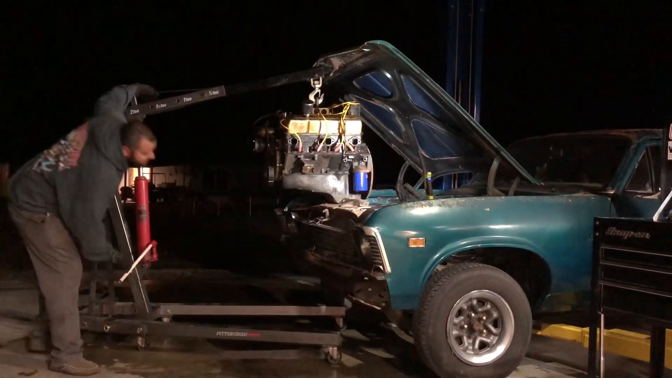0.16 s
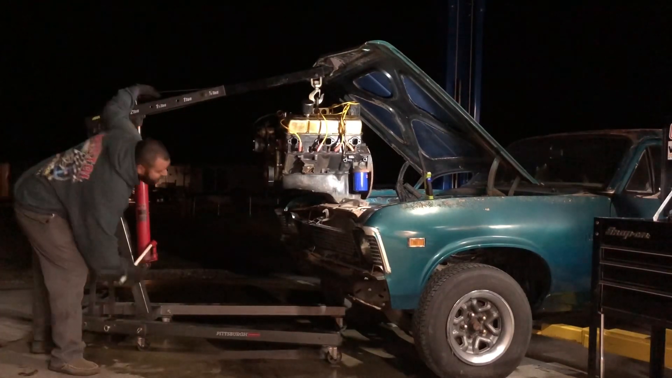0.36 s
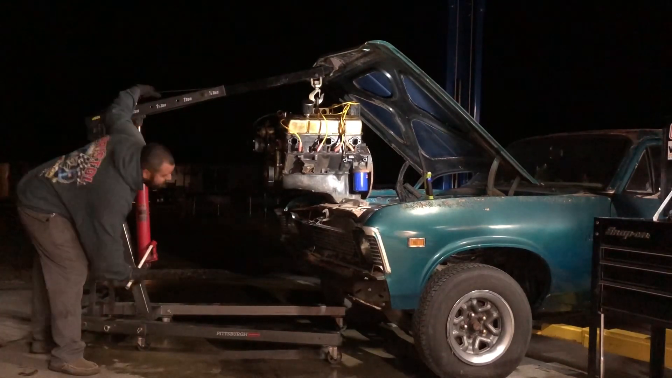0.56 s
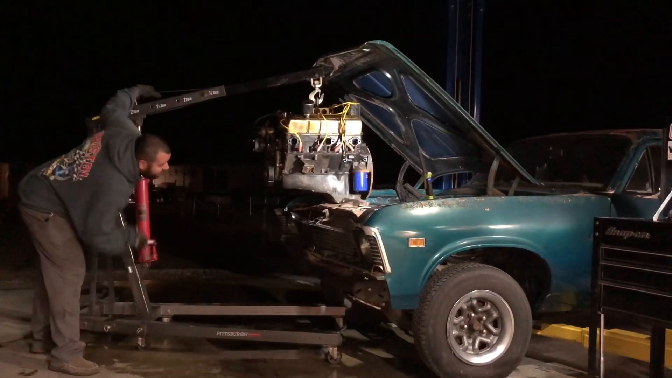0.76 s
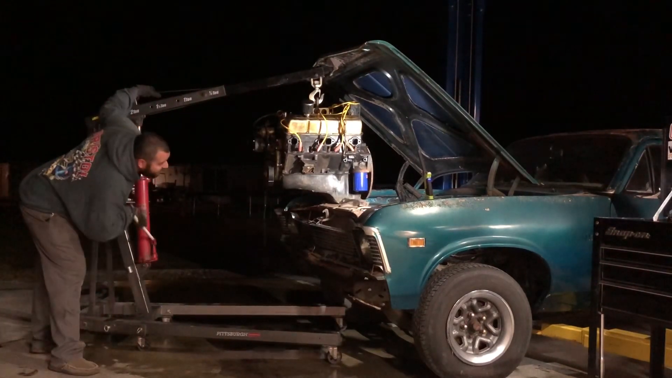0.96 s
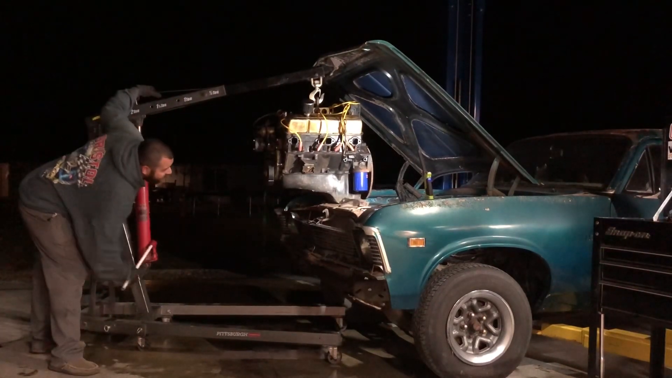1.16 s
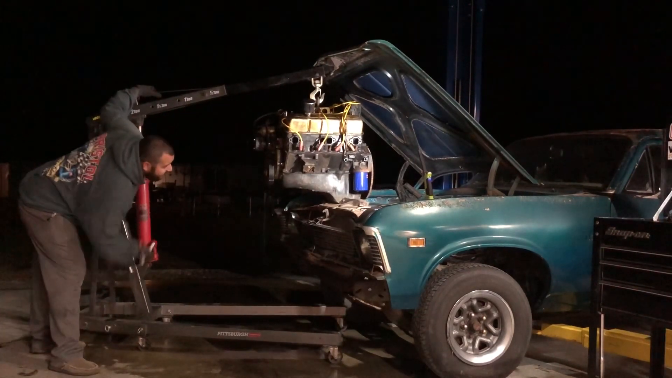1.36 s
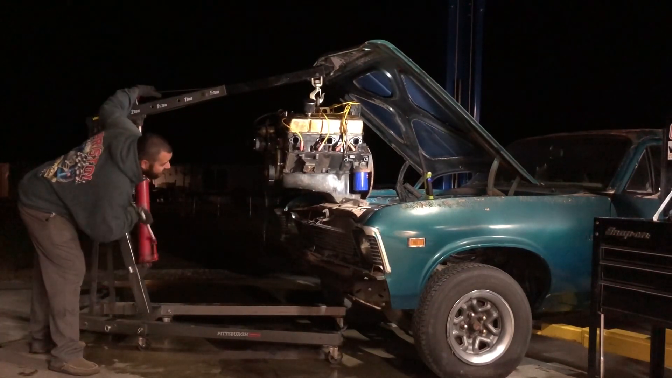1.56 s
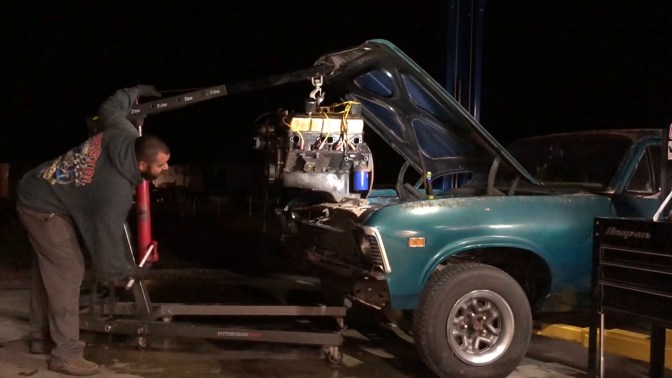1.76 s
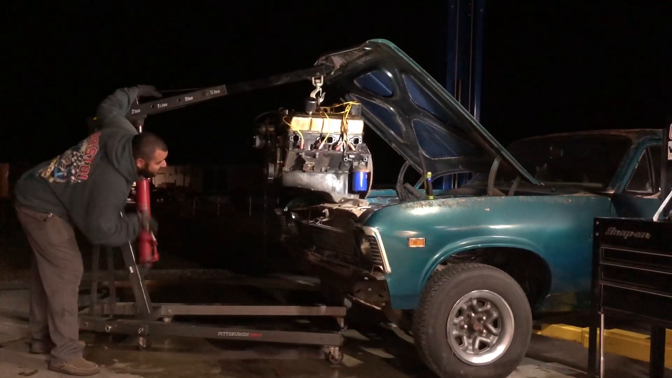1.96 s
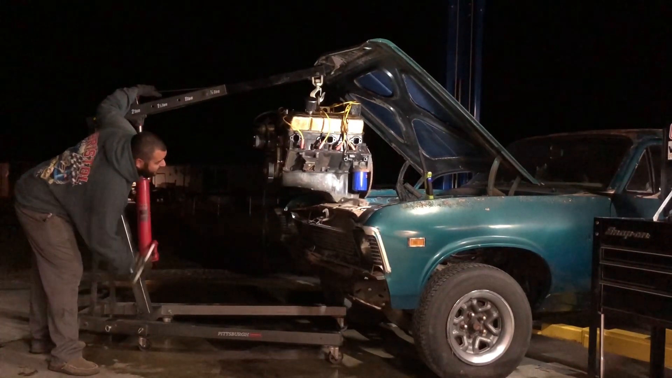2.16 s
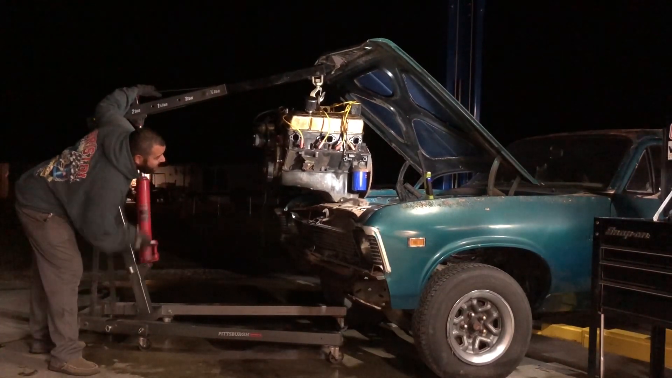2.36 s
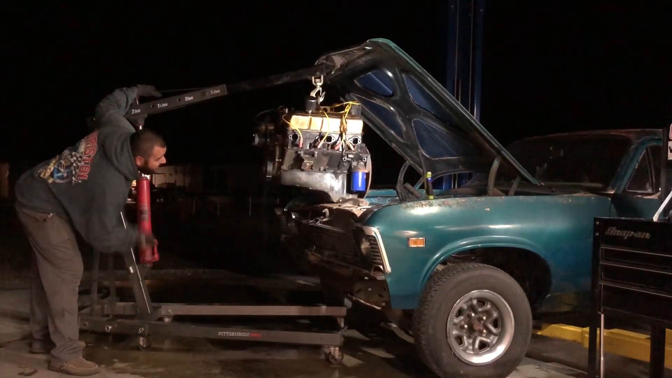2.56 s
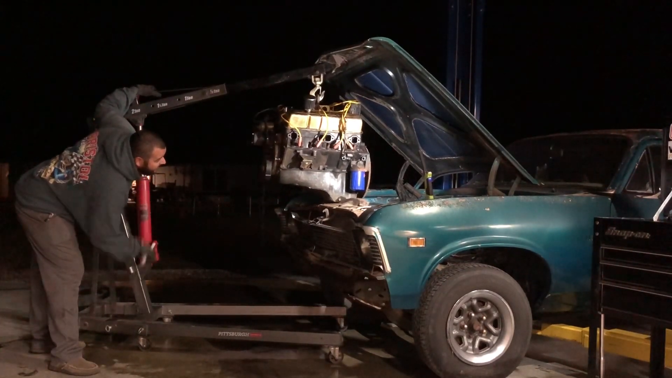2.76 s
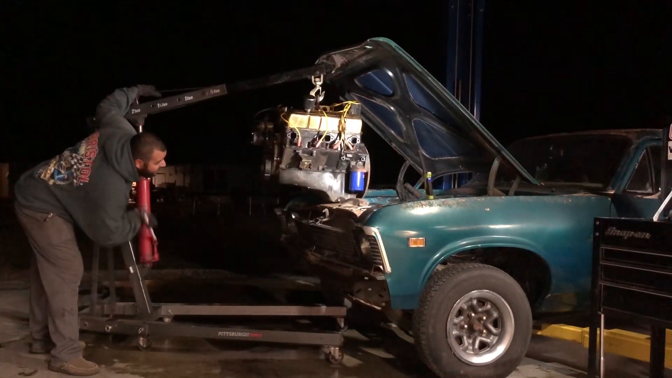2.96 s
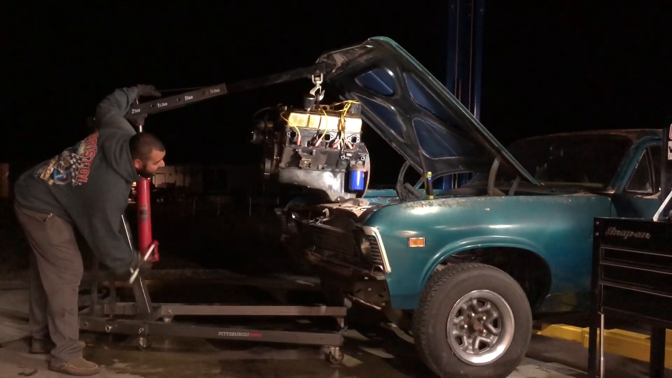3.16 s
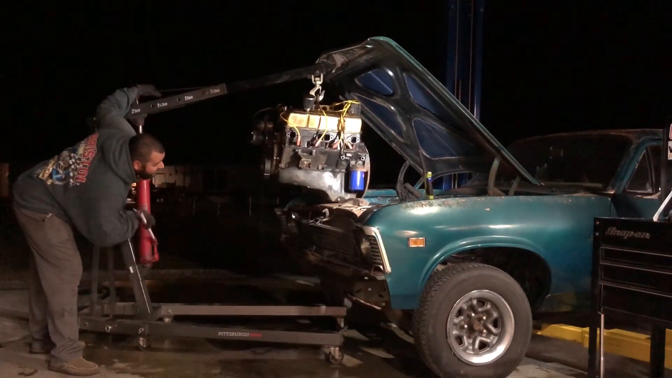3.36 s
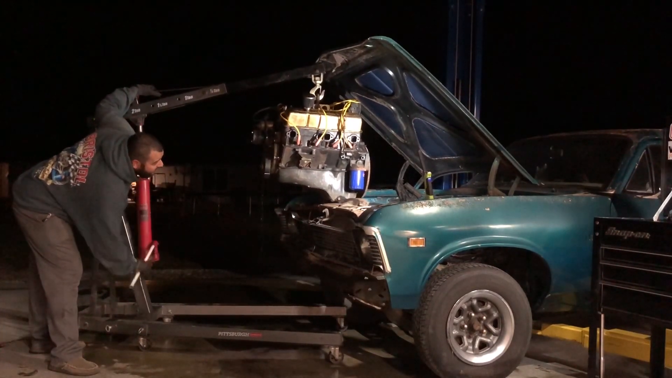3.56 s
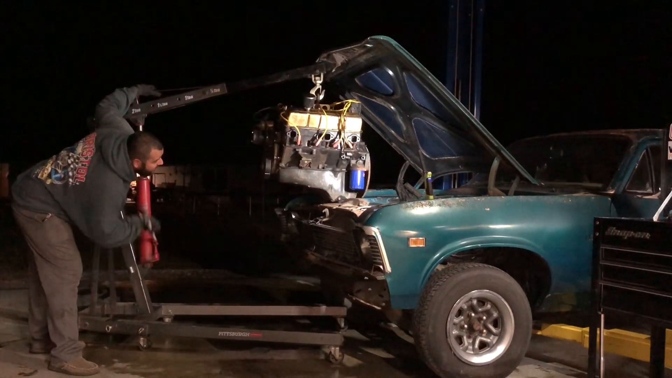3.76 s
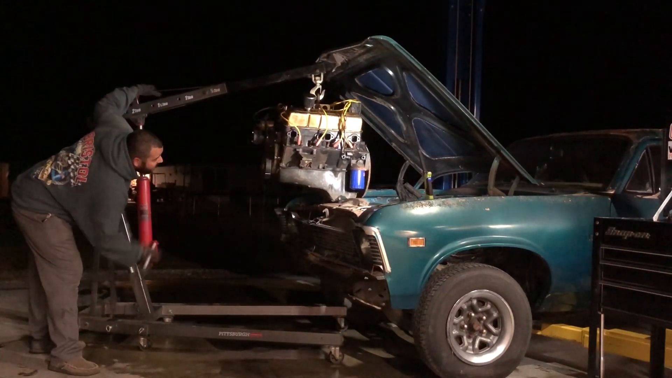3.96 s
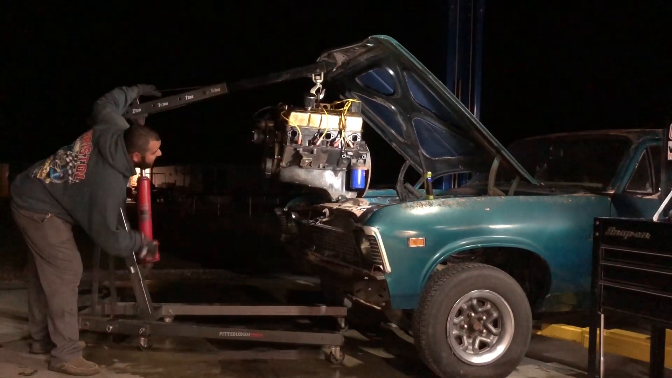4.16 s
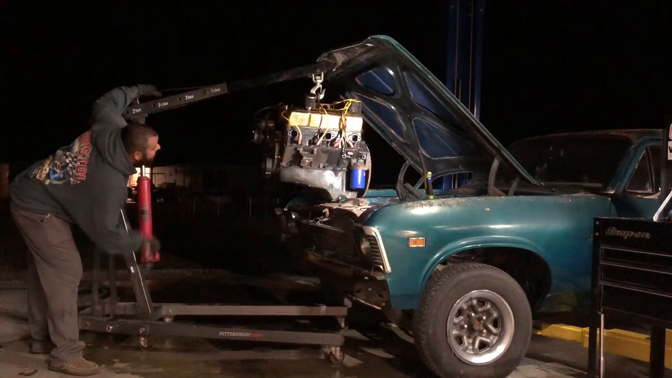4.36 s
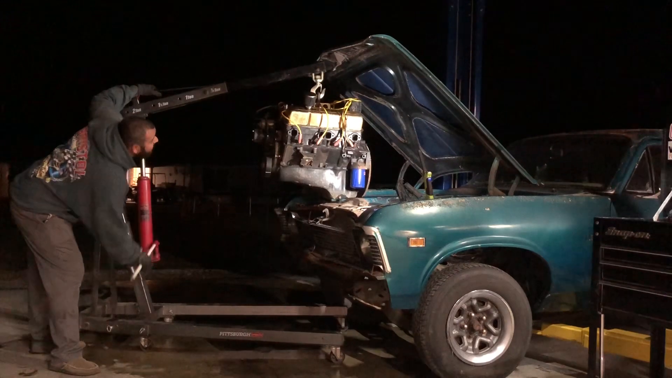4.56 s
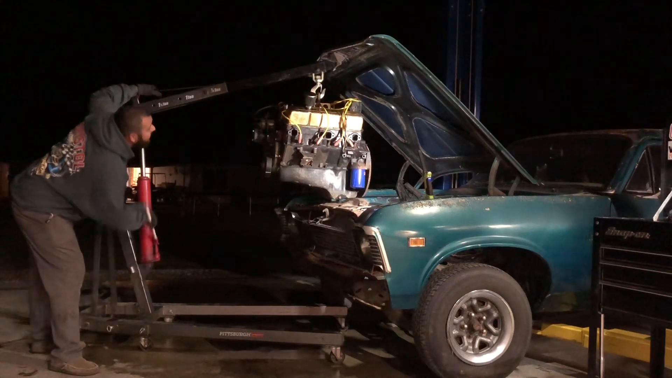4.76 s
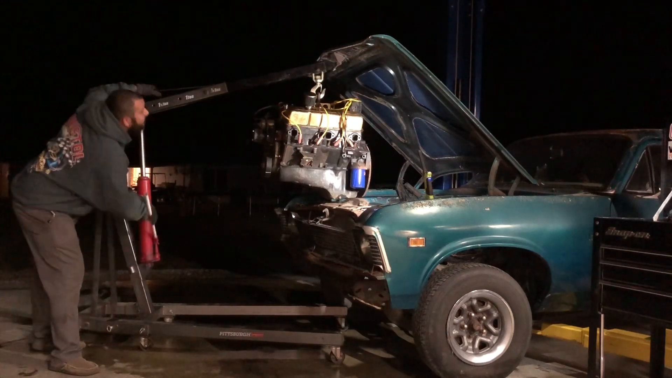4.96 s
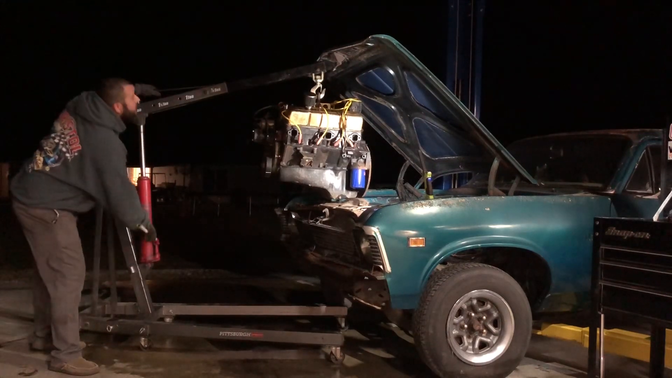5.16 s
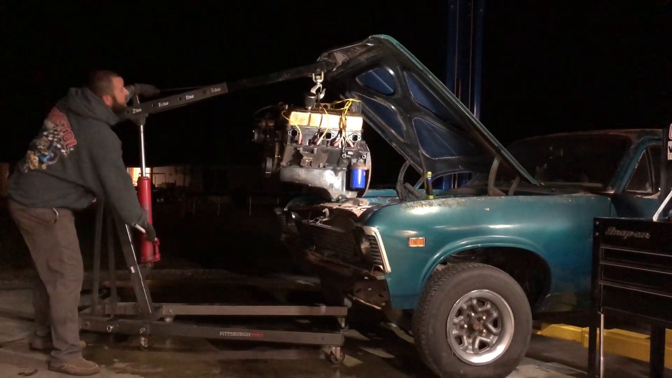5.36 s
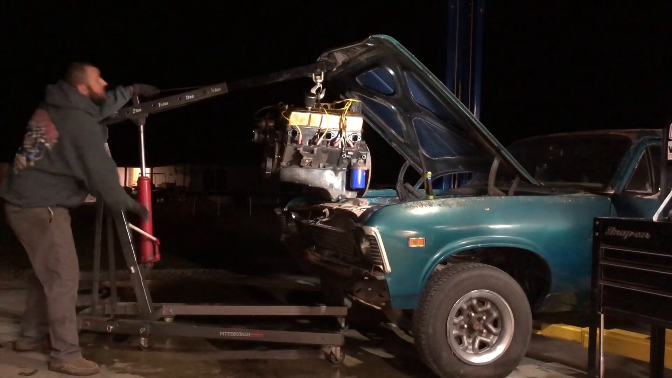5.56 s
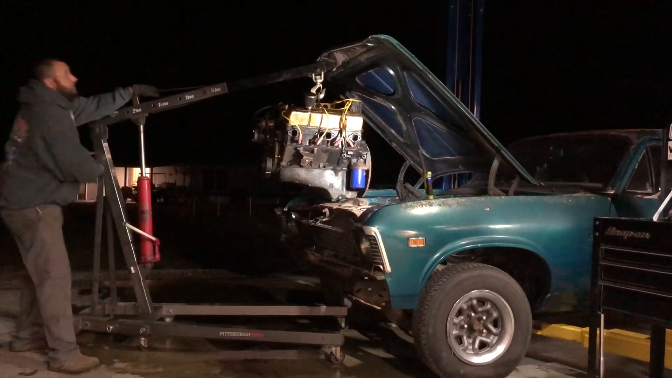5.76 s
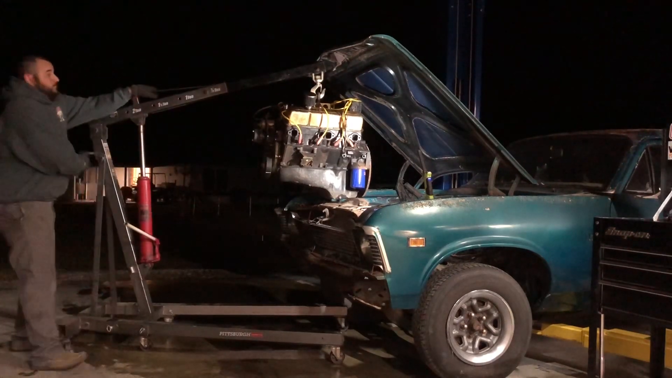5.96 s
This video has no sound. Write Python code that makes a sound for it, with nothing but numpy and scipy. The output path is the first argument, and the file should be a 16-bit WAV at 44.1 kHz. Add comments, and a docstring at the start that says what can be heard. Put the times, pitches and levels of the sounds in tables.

```python
"""Steel clanks, rattles and rings as a man pumps the handle of a hydraulic engine hoist in a bare yard at night.
Each clank is a short burst of crackling noise plus the fading ring tones of the loose handle.
The loaded frame adds dull knocks of soft noise and its own low ring; loose parts tick at random.
Fading noise makes the short tail from the walls; far traffic, mains hum and a low drone lie under it all,
and a burst of bright noise makes the scuffing hiss at the end."""
import sys
import numpy as np
from scipy import signal
from scipy.fft import rfft, irfft
from scipy.io import wavfile
from scipy.ndimage import uniform_filter1d

SR = 44100
rng = np.random.default_rng(int(sys.argv[2]) if len(sys.argv) > 2 else 0)


def master(y):
    """Save y as 16-bit WAV."""
    cut = np.clip(np.atleast_2d(y).T, -1, 1)
    pcm = np.round(cut * 32767)  # scale
    wavfile.write(sys.argv[1], SR, pcm.astype(np.int16))


N = 265029

# ring tones of the handle and ram: (pitch [Hz], relative level [dB], time to fall 60 dB [s])
HANDLE_MODES = [(1770, -10.5, 0.14), (1826, -2, 0.26), (2267, -0.5, 0.15), (2350, -7.5, 0.055),
                (2584, 1, 0.11), (2700, -3, 0.24), (3330, -15, 0.054), (3360, -1.5, 0.22),
                (3520, -4.5, 0.25), (4550, -10, 0.071), (4660, -29.5, .13), (4880, -2.5, 0.15),
                (5110, -9.5, 0.42), (5280, -4.5, 0.19), (5810, -23.5, .1), (6300, -12, 0.1),
                (6700, -9, 0.4), (6810, 4, 0.047), (7200, -20, 0.14), (9130, -17, 0.079),
                (8770, 6.5, 0.054), (8550, -26.5, 0.076), (10750, -10.5, 0.12), (10700, -16, .08),
                (10810, 4.5, 0.088), (13400, -3.5, 0.15), (15450, -5.5, .07)]
# ring tones of the hoist frame: (pitch [Hz], relative level [dB], time to fall 60 dB [s])
FRAME_MODES = [(258, -1, .15), (292, -15.5, .12), (352, -11, .1), (427, -14.5, 0.17), (584, -7, .06),
               (730, -1.5, 0.025), (842, 6, .08), (980, 4.5, 0.056), (964, -7, 0.15), (1430, -2.5, .08)]


def undb(db):
    """Turn decibels into a plain amplitude factor."""
    return 10 ** (np.asarray(db) / 20)


def unit(x):
    """Scale a sound to an average (RMS) level of 1."""
    return x / np.sqrt(np.mean(x ** 2))


def colour(x, hz, db):
    """Filter by (Hz, dB) points joined on a log-frequency axis."""
    freq = np.maximum(np.fft.rfftfreq(len(x), 1 / SR), 1)
    gain = undb(np.interp(np.log(freq), np.log(hz), db))
    return irfft(rfft(x) * gain, len(x))


def walk(rate):
    """Random values, `rate` new ones a second, joined by straight glides and scaled to RMS 1."""
    hold = int(SR / rate)
    steps = np.repeat(rng.standard_normal(N // hold + 1), hold)
    return unit(uniform_filter1d(steps, hold)[:N])


def add(track, s, x):
    """Mix a sound into the track, starting at s seconds."""
    start = int(s * SR)
    track[start:start + len(x)] += x[:len(track) - start]


def blow(noise, t60, rise_s, db):
    """Noise under a quick rise and an exponential fall, with the energy that the envelope alone would have."""
    t = np.arange(len(noise)) / SR
    rise = 1 - np.exp(-(t / rise_s) ** 2)
    shape = rise * undb(-60 * t / max(t60, .004))
    return unit(noise * shape) * np.sqrt(np.mean(shape ** 2)) * undb(db)


def struck(modes, favoured_hz, lift_db, spread):
    """The place of the blow lifts the modes near one pitch; spread is a width in log frequency."""
    lifted = []
    for hz, db, t60 in modes:
        closeness = np.exp(-(np.log(hz / favoured_hz) / spread) ** 2)
        lifted.append((hz, db + lift_db * closeness, t60))
    return lifted


def ring(modes, rough, flicker):
    """Fading sine tones set off by one blow; loose contact soon makes them flicker, which smears their pitch."""
    t = np.arange(SR // 3) / SR
    smear = rough * (1 - np.exp(-t / .012))
    out = 0
    for hz, db, t60 in modes:
        # each mode reads the flicker from a different place
        waver = 1 - smear + smear * np.roll(flicker, int(7 * hz))[:len(t)]
        # a little stronger or weaker every time
        start_db = db + 3 * rng.standard_normal()
        fade = undb(start_db - 60 * t / max(t60, .01))
        out = out + waver * fade * np.sin(2 * np.pi * (hz * t + rng.random()))
    return out * (1 - np.exp(-(t / 0.0017) ** 2))


def clanks():
    """Steel on steel: a rattle of tiny contacts cracks in the air and sets the handle ringing."""
    # blows: (time [s], crack level [dB], body at 2 kHz [dB], sharpness at 13.5 kHz [dB],
    #         favoured ring [Hz], time for the crack to fall 60 dB [s]); body and sharpness relative to 4.8 kHz
    clank_table = [(0.3312, -44.5, 18, -44, 2020, 0.1), (0.588, -47, 7, -22, 4160, 0.086),
                   (0.6163, -39, 2, -23, 3440, .048), (.629, -29.5, 4, -1, 10200, 0.04),
                   (0.7092, -31.5, 1, -16, 4530, 0.077), (0.7824, -40, -4, -18, 3560, 0.03),
                   (0.8094, -20.5, 1.5, -16, 8760, 0.036), (.8934, -37, -4, -22, 3980, 0.027),
                   (0.939, -37.5, 4, -7, 4240, 0.027), (0.95, -42, 10, -14, 4580, 0.055),
                   (0.992, -47, -3, -6, 8770, .028), (1.0877, -25.5, 6.5, -27, 4670, 0.099),
                   (1.2024, -44, 12, -25, 3500, 0.021), (1.2204, -39, -5, -16, 3540, 0.059),
                   (1.2787, -37, 2, -2, 6500, 0.069), (1.312, -40.5, -15.5, -9.5, 11900, 0.031),
                   (1.3253, -27, -13, -18.5, 4500, 0.071), (1.417, -34, -14.5, -6, 11000, 0.01),
                   (1.4379, -14.5, -5.5, -6, 5240, 0.038), (1.4994, -42, -11, -12, 3560, 0.05),
                   (1.5294, -35.5, 7, -9, 3570, 0.049), (1.5625, -38.5, 12, -21, 5110, 0.13),
                   (1.6592, -24, 0.5, -25, 3560, 0.092), (1.703, -36, -10, -7, 3490, .045),
                   (1.7587, -34, 0, -21, 3630, 0.065), (1.8087, -37, -7.5, -11, 3500, 0.041),
                   (1.825, -36.5, -5, -29, 3460, 0.14), (1.9002, -39, -21, -5.5, 3520, 0.048),
                   (1.9365, -49.5, 12, 8.5, 11000, 0.073), (1.9722, -7, -5.5, -7.5, 6300, 0.049),
                   (1.9914, -17, -2, -16, 6700, 0.021), (2.049, -28.5, 6, -30, 6750, .033),
                   (2.1136, -26, 9.5, -22.5, 3570, 0.093), (2.2077, -44, 4, -13, 4880, 0.25),
                   (2.2438, -29, -10, -4, 6630, 0.044), (2.2825, -31.5, -2, -19.5, 4860, .04),
                   (2.2973, -25.5, -3, -11, 4990, 0.078), (2.3925, -44, -3, 0, 3490, 0.069),
                   (2.438, -6.5, -1, -5, 8770, 0.054), (2.5696, -31, 6, -39, 3440, 0.03),
                   (2.6534, -32, -14, -18.5, 3440, 0.022), (2.6891, -31.5, 3, -6, 3650, 0.034),
                   (2.7396, -37.5, -9, -25.5, 4000, 0.069), (2.7701, -38, -21, -10, 4790, 0.07),
                   (2.7764, -32.5, -28, -33, 5180, 0.025), (2.8347, -39.5, 1, 4.5, 11000, 0.033),
                   (2.8711, -9.5, -6, -11, 8640, .055), (2.9544, -42, -18, -14, 3540, .029),
                   (3.0021, -40, -21, -23.5, 5070, 0.038), (3.0924, -48, -15, -40, 5100, .052),
                   (3.106, -35, 2, -22.5, 3500, 0.072), (3.1537, -27.5, 3, -1, 4660, 0.034),
                   (3.2073, -38.5, -1, -29, 4930, 0.09), (3.2565, -47, -3, 3.5, 3370, 0.048),
                   (3.3354, -8.5, 0, -6.5, 4360, 0.047), (3.3541, -16, -21, -14, 6400, 0.048),
                   (3.3901, -34, 5, -22.5, 4540, 0.12), (3.6017, -30.5, 2, 0, 6600, .043),
                   (3.6563, -33.5, -3, -30, 5220, 0.051), (3.7328, -37.5, 0, -4, 11500, .029),
                   (3.7594, -8.5, -5, -7.5, 8770, 0.051), (3.9924, -46, -12, -27, 5120, 0.037),
                   (4.0077, -33.5, 2, -22, 3800, 0.041), (4.0652, -41, -10, -3, 9200, 0.093),
                   (4.0752, -32.5, 0, -6, 3450, 0.037), (4.141, -37.5, -9, -32, 4860, 0.061),
                   (4.189, -50, -21, -5, 5290, .06), (4.1983, -19, 0.5, -8, 5200, 0.049),
                   (4.2642, -43, 5, -22, 5100, 0.11), (4.363, -37.5, 6.5, -40, 3500, 0.15),
                   (4.4243, -42.5, -2, -10, 4640, 0.046), (4.4727, -46, -4, -27, 3570, 0.051),
                   (4.4944, -47, 0, -19, 3920, 0.04), (4.5517, -32, 0, -3, 9700, 0.031),
                   (4.6017, -52, 1.5, -15, 3460, 0.058), (4.708, -50, -4, -8, 9900, 0.032),
                   (4.7192, -47, 1, -36, 5110, 0.071), (4.905, -49, 5, -43, 4470, 0.09),
                   (5.017, -51, -6, -12, 3670, 0.051), (5.2475, -49.5, -1, 8, 9480, 0.04),
                   (5.6144, -62, 2, 0, 3530, .04), (5.648, -58, -5, 7, 3280, .048)]
    # corner frequencies of a clank's colour: [Hz]
    corner_hz = [500, 2000, 4800, 9000, 13500]
    # bumps and dips in the steel's radiation: (centre [Hz], width [Hz], level [dB])
    radiation = [(2350, 160, 1.5), (2760, 200, -1), (4280, 180, 0), (7970, 260, -10), (10000, 260, 2),
                 (14500, 880, -5)]
    crack_lift_db, crack_spread = 8, 0.061  # the crack too is stronger around the favoured ring
    crack, chime = np.zeros(N), np.zeros(N)
    flicker = walk(260)[:SR]
    for s, db, body_db, sharp_db, ring_hz, t60 in clank_table:
        # levels at the corners: 500 Hz lies 14 dB under the body, 9 kHz partly follows the sharpness
        tint_db = [body_db - 14, body_db, 0, 0.38 * sharp_db, sharp_db]
        # uneven grains: the contact chatters rather than hisses
        uneven_db = 2.5 * np.repeat(rng.standard_normal(SR // 80 + 1), 20)[:SR // 4]
        grains = rng.standard_normal(SR // 4) * undb(uneven_db)
        around_ring_hz = ring_hz * np.exp(crack_spread * np.array([-1, 0, 1]))
        grains = colour(grains, around_ring_hz, [0, crack_lift_db, 0])
        add(crack, s - .002, blow(colour(grains, corner_hz, tint_db), t60, 0.0029, db))

        # the ring takes on the colour of the crack
        modes = []
        for hz, mode_db, mode_t60 in HANDLE_MODES:
            mode_tint_db = np.interp(np.log(hz), np.log(corner_hz), tint_db)
            modes.append((hz, mode_db + mode_tint_db, mode_t60))
        modes = struck(modes, ring_hz, lift_db=6, spread=0.077)
        # harder blows ring slightly more, relative to their crack
        ring_db = db - 19 + 0.0334 * (db + 29.5)
        tones = ring(modes, .75, np.roll(flicker, int(s * SR)))
        add(chime, s - .002, undb(ring_db) * tones)
    freq = np.fft.rfftfreq(N, 1 / SR)
    radiation_db = sum(db * np.exp(-((freq - centre) / width) ** 2) for centre, width, db in radiation)
    return irfft(rfft(crack + jiggle()) * undb(radiation_db), N) + chime


def pings():
    """Handle or frame swings free: with no hand on it, one mode stands far above its neighbours."""
    # clear tones: (time [s], level [dB], pitch [Hz])
    ping_table = [(.8096, -37, 5110), (0.8088, -30, 8770), (1.091, -39, 584), (1.3244, -43.5, 6810),
                  (1.4376, -30, 5110), (1.4376, -27, 8770), (1.662, -29, 981), (2.873, -32, 981),
                  (3.6561, -37, 5280), (4.138, -46, 6810), (4.1969, -33, 5110), (4.7192, -49, 5110)]
    lift_db = 25
    out, flicker = np.zeros(N), walk(110)[:SR]
    for s, db, hz in ping_table:
        modes = struck([*HANDLE_MODES, *FRAME_MODES], hz, lift_db, .02)
        tones = ring(modes, .3, np.roll(flicker, int(s * SR)))
        # the lift is taken off again, so mainly the neighbours get weaker
        add(out, s - .002, undb(db - lift_db) * tones)
    return out


def knocks():
    """The frame takes the load: soft noise blows thud and shake it into ringing; the bass lasts longer."""
    # knocks: (time [s], thud level [dB], centre [Hz], bass relative to thud [dB], time for thud to fall 60 dB [s])
    knock_table = [(.329, -39.5, 730, -19, 0.19), (.992, -30.5, 980, -15, 0.086),
                   (1.091, -33, 616, -19, 0.19), (1.573, -32.5, 780, -21.5, 0.12),
                   (1.662, -22.5, 985, -17, 0.035), (1.972, -29.5, 1040, -7, 0.071),
                   (2.053, -27.5, 974, -14, .08), (2.11, -40.5, 805, -15, 0.14),
                   (2.44, -32, 990, -11, 0.15), (2.511, -28, 820, -19.5, 0.083),
                   (2.574, -28.5, 1000, -22.5, 0.043), (2.873, -29, 1080, -14.5, 0.095),
                   (2.957, -26, 1280, -19, 0.076), (3.334, -27, 950, -12, 0.079),
                   (3.404, -29, 980, -12, 0.12), (3.473, -34.5, 896, -19, 0.026),
                   (3.757, -34.5, 1450, -6.5, 0.085), (3.856, -29.5, 974, -13, .091),
                   (4.307, -29, 1280, -18, 0.11), (4.365, -37.5, 1000, -25, 0.13)]
    out, flicker = np.zeros(N), walk(60)[:SR]
    for s, db, hz, bass_db, t60 in knock_table:
        thud_hz = [hz / 8, hz / 2, hz, hz * 3.2, hz * 8]
        thud = colour(rng.standard_normal(SR // 4), thud_hz, [-34.5, -1.5, 8.5, -6.5, -33.0])
        add(out, s - .003, blow(thud, t60, 0.0067, db))
        bass = colour(rng.standard_normal(SR // 4), [60, 200, 270, 500, 1200], [-37.5, -17.5, -4.5, -6.5, -48.5])
        add(out, s, blow(bass, 3.38 * t60, 0.013, db + bass_db))
        modes = struck(FRAME_MODES, hz, lift_db=7.27, spread=0.12)
        tones = ring(modes, 1.0, np.roll(flicker, int(s * SR)))
        add(out, s, undb(db - 19) * tones)
    return out


def jiggle():
    """Chain links and pins tick at random while the handle is worked."""
    # loudness of the loose parts: (time [s], level [dB])
    jiggle_levels = [(.55, -67), (.9, -60.5), (1.5, -51.5), (2.5, -51.5), (3.5, -57.5), (4.2, -58),
                     (4.62, -61.5)]
    s, db = np.transpose(jiggle_levels)
    ticks_per_s = 260
    chance = rng.random((2, N))
    # most ticks are weak, a few are much stronger
    strength = undb(-3.0 * np.log(1 - chance[1]))
    ticks = (chance[0] < ticks_per_s / SR) * strength
    # every tick is a few milliseconds of chatter
    fading = signal.lfilter([1], [1, -np.exp(-1 / (0.003 * SR))], ticks)
    chatter = fading * rng.standard_normal(N)
    bright = colour(chatter, [800, 2500, 6000, 15000], [-7.5, -2.5, -10, -25.5])
    level_db = np.interp(np.arange(N) / SR, s, db, left=-140, right=-140)
    return unit(bright) * undb(level_db)


def scuff():
    """Something drags for a moment: bright noise with a fine flicker."""
    # loudness of the drag: (time [s], level [dB])
    scuff_levels = [(5.74, -90), (5.75, -77), (5.79, -57.5), (5.844, -47.5), (5.9, -54), (5.988, -53.5),
                    (6.01, -62)]
    # tone colour of the drag: (frequency [Hz], relative level [dB])
    scuff_tint = [(1200, -10), (3500, 1.5), (9500, -10), (16000, -15)]
    s, db = np.transpose(scuff_levels)
    level_db = np.interp(np.arange(N) / SR, s, db, left=-140) + 1.3 * walk(60)
    noise = unit(colour(rng.standard_normal(N), *np.transpose(scuff_tint)))
    return undb(level_db) * noise


def yard(x):
    """Car body and floor answer quickly; the walls return a longer tail that loses its treble first."""
    # tail from the walls: (band centre [Hz], time to fall 60 dB [s], starting level [dB])
    wall_bands = [(260, 0.62, -24), (1000, 0.57, -31), (2140, 0.67, -38.5), (4040, 0.7, -39),
                  (6860, 0.49, -42), (10000, 0.28, -41.5), (15000, .3, -42)]
    hz, t60, db = np.transpose(wall_bands)
    t = np.arange(SR) / SR
    near = colour(rng.standard_normal(SR), [500, 3000, 7000, 15000], [19.5, 10.5, 3.5, -16.0])
    tail = near * (1 - np.exp(-t / 0.00043)) * undb(-41 - 60 * t / 0.07)
    for k in range(len(hz)):
        # full level at this band's centre, 30 dB less at all the others
        band_db = np.where(np.arange(len(hz)) == k, 0, -30)
        band = colour(rng.standard_normal(SR), hz, band_db)
        tail = tail + band * (1 - np.exp(-t / 0.0011)) * undb(db[k] - 60 * t / t60[k])
    # every sample of the sound sets off its own copy of the tail
    return signal.fftconvolve(x, tail)[:N]


def night():
    """Far traffic (noise) swells a little, mains hum wavers in pitch and level, a low drone comes and goes."""
    # tone colour of the traffic: (frequency [Hz], relative level [dB])
    traffic_tint = [(13, -72), (22, -54), (43, -22), (58, -7.5), (106, -2.5), (132, -7.5), (152, -8.5),
                    (211, -14.5), (319, -18), (710, -14), (771, -11), (885, -10.5), (1300, -12.5),
                    (1860, -19), (2590, -26.5), (16000, -70)]
    # hum tones: (pitch [Hz], level [dB], pitch wander [Hz])
    hum_tones = [(61.2, -52.5, 9.5), (114.6, -54, 6.3)]
    # loudness of the drone, a narrow band of noise near 220 Hz: (time [s], level [dB])
    drone_levels = [(0, -58), (.5, -54.5), (.75, -87), (1.8, -72), (2.1, -59), (3.2, -67), (3.5, -58),
                    (4.9, -51), (6.01, -60)]
    traffic = unit(colour(rng.standard_normal(N), *np.transpose(traffic_tint)))
    traffic = traffic * undb(-44 + .8 * walk(2.5))
    hum = 0
    for hz, db, wander in hum_tones:
        level = undb(db + 3.1 * walk(10))
        cycles = np.cumsum(hz + wander * walk(7.1)) / SR
        hum = hum + level * np.sin(2 * np.pi * cycles)
    drone = unit(colour(rng.standard_normal(N), [150, 195, 222.4, 230, 314], [-49.5, -13, -4.5, -11.0, -60.5]))
    drone_db = np.interp(np.arange(N) / SR, *np.transpose(drone_levels))
    return traffic + hum + drone * undb(drone_db)


def scene():
    """The hoist and its tail from the yard, the scuff and the night, on one channel."""
    hoist = clanks() + knocks() + pings()
    return (hoist + yard(hoist) + scuff() + night())[None]


def record(dry):
    """The camera adds a faint hiss, rounds the loudest peaks and cuts the top."""
    hiss = undb(-80) * rng.standard_normal(dry.shape)
    rounded = 1.3 * np.tanh((dry + hiss) / 1.3)
    top_hz = 15750
    low_pass = signal.ellip(8, .2, 60, top_hz, fs=SR, output="sos")
    return signal.sosfilt(low_pass, rounded)


dry = scene()
out = record(dry)
master(out)
```